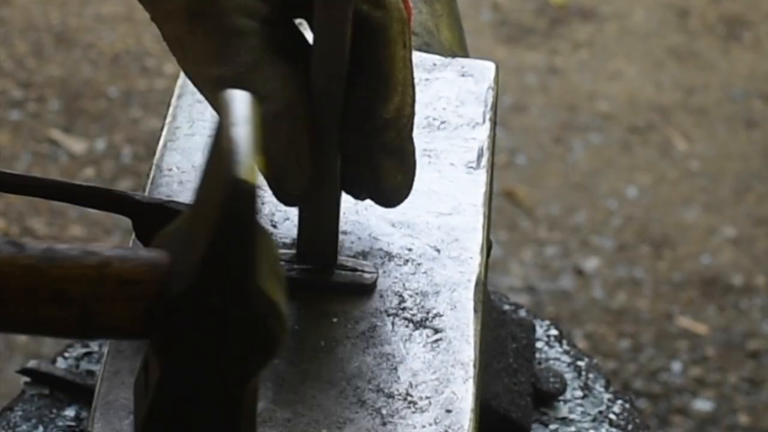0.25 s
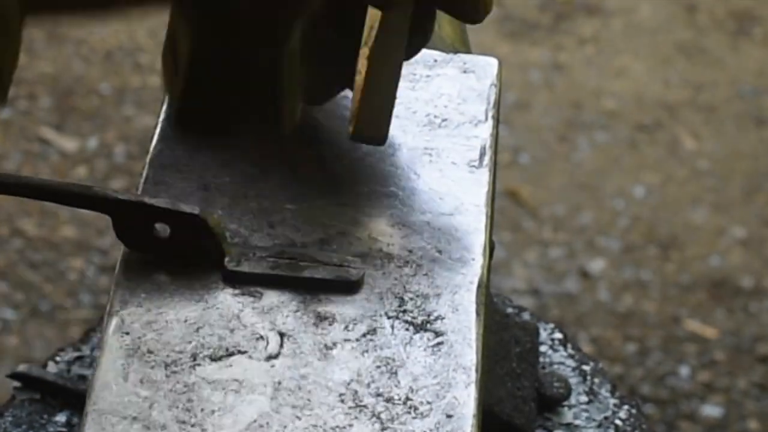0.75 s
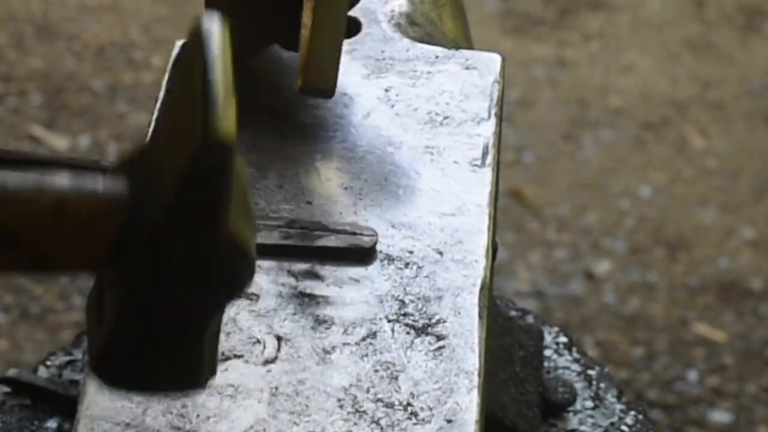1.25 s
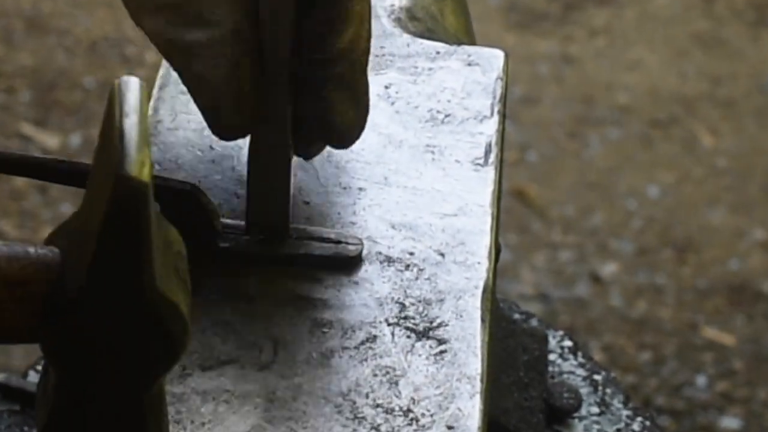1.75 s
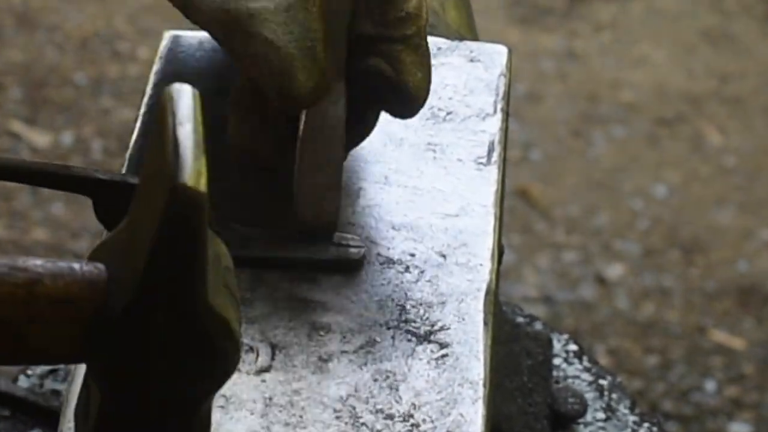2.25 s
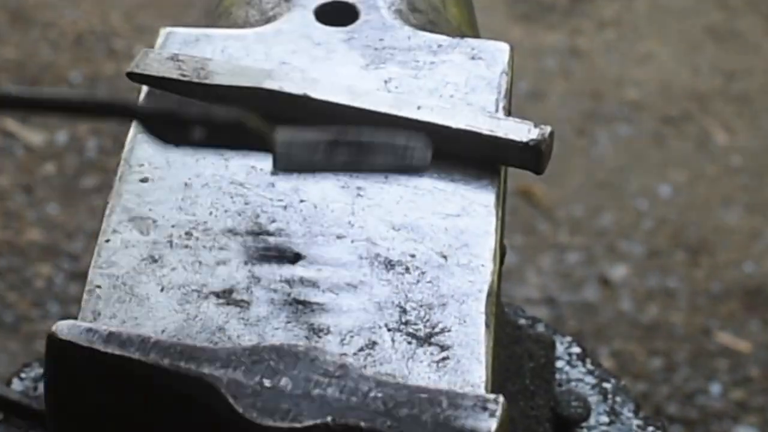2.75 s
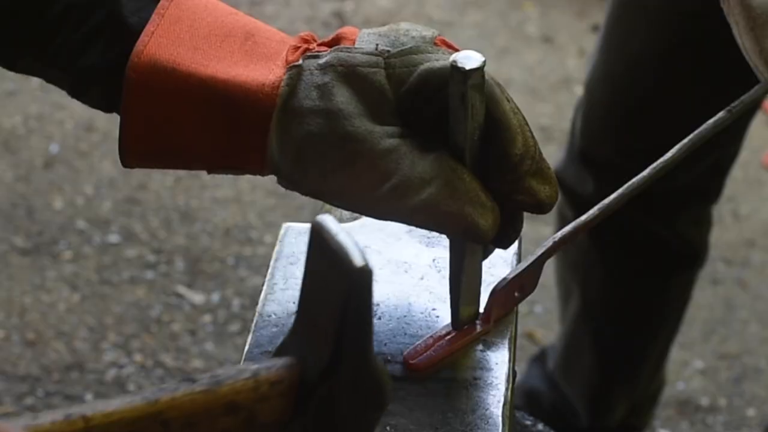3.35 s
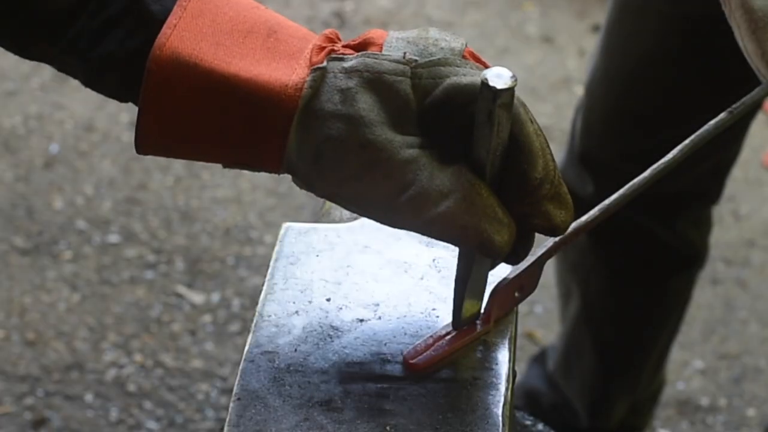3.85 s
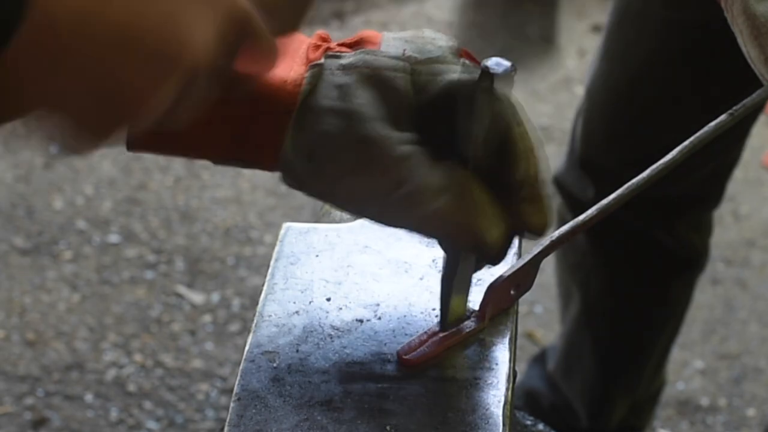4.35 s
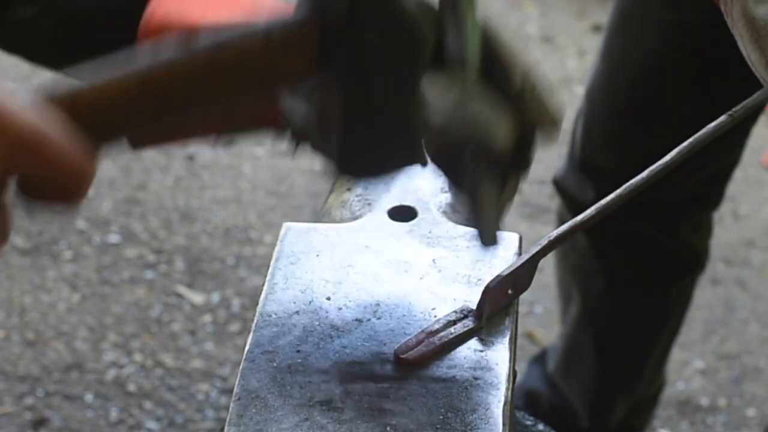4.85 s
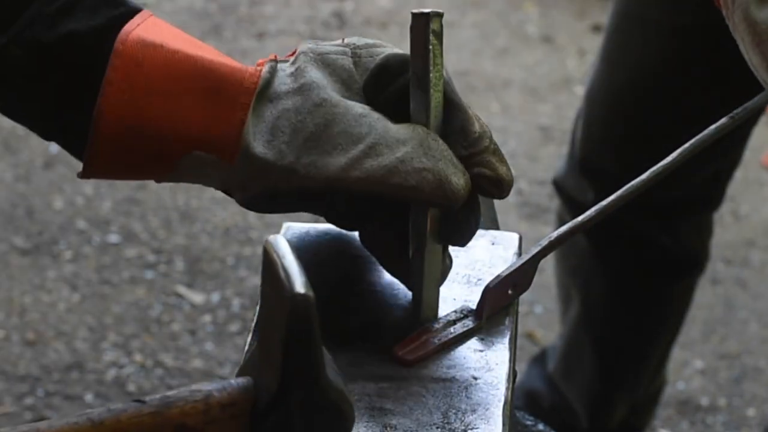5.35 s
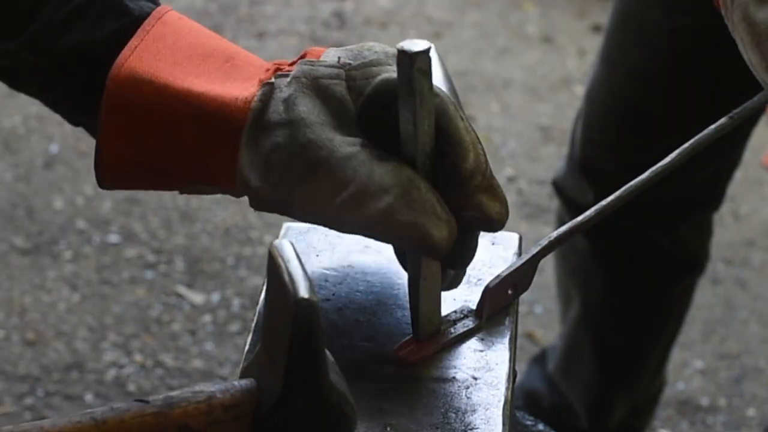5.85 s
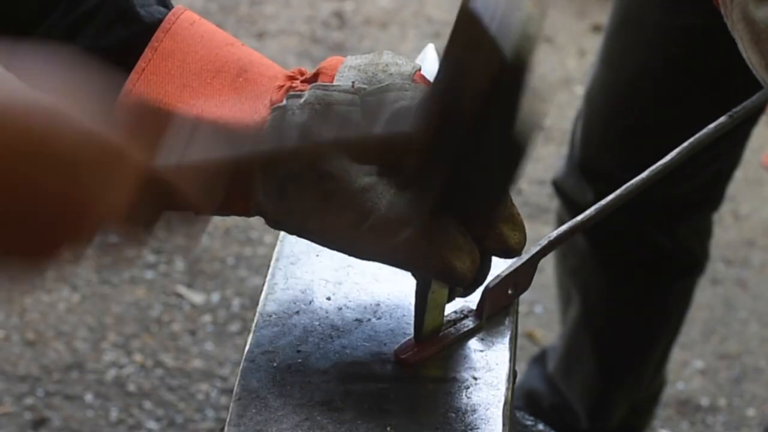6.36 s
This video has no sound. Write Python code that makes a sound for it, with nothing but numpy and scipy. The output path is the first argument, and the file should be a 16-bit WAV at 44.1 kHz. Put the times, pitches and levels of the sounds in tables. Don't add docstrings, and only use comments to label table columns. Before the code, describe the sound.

A forge blower runs throughout. From 0 to 3.4 s the sound is eight times too fast: the hum becomes a thin, high, airy whine, and chisel blows are dry, tiny snaps at about 0.4, 0.8, 1.3, 1.6, 1.9, 2.2 and 2.5 s. A hammer's rebounds buzz briefly at the very start and just after each blow. Around 2.75-2.88 s tongs and a tool clink in a tight rattle, then only hum. At 3.4 s it cuts to true speed, with a low wavering blower. Hard, clipping hammer-on-chisel blows crack at 4.18, 4.46 and 4.78 s, the last askew, with bright damped ringing, shop echo and a block boom; cuts chop the tails. From 5.15 s a hammer bounces, faster and softer, settling by 5.52 s. Brief dips come at 5.0 and 5.7 s; faint ticks at 5.07, 5.61, 5.71 and 6.11 s, then blower alone.

```python
import sys
import numpy as np
from scipy import signal
from scipy.fft import rfft, irfft, next_fast_len
from scipy.io import wavfile
from scipy.ndimage import uniform_filter1d

SR = 44100
rng = np.random.default_rng(int(sys.argv[2]) if len(sys.argv) > 2 else 0)


def store_wav(level_fs):
    pcm = np.round(np.clip(np.atleast_2d(level_fs), -1, 1) * 32767)
    wavfile.write(sys.argv[1], SR, pcm.T.astype(np.int16))


def linear_from_db(decibels):
    return 10 ** (np.asarray(decibels, float) / 20)


N = 290619

FAST, FAST_END_S = 8, 3.4
TOP_HZ = 15650
CONTACT_LAG_S = .0009
# [f/Hz, level/dB, t60/s]
CHISEL_MODES = [(700, -14, .3), (2035, -17, .25), (2935, -7, .4), (5630, -12, .4), (6600, -5, .25),
                (6655, -5, .23), (7004, -9, .33), (7400, -20, .25), (8021, -19, .22), (8231, -7, .22),
                (8452, -18, .2), (8818, -17, .23), (9297, -12, .15), (9469, -4, .22), (9520, -4, .18),
                (9830, -14, .2), (11250, -17, .2), (11790, -14, .15), (12690, -21, .2), (12930, -22, .22),
                (13220, -17, .14), (14060, -16, .17), (14260, -27, .2), (14870, -18, .29),
                (15150, -18, .17)]
# [f/Hz, level/dB, t60/s]
HAMMER_MODES = [(790, -10, .15), (1410, -12, .15), (1860, -7, .12), (2035, 1, .22), (2089, -5, .28),
                (2681, -12, .15), (2920, -10, .1), (3520, -8, .25), (4322, -12, .3), (5166, -14, .26),
                (5642, -15, .18), (6590, -13, .25), (6616, -8, .28), (7000, -22, .15), (8236, -24, .14),
                (8452, -21, .13), (9420, -24, .2), (9512, -20, .22), (9830, -24, .19), (11240, -25, .1),
                (11790, -37, .12), (12510, -35, .11), (12690, -35, .12), (13220, -38, .12),
                (14260, -30, .22), (15150, -42, .13)]


def add(out, i, x):
    out[i:i + len(x)] += x
    return out


def on_log(hz, table):
    f, v = np.transpose(table)
    return np.interp(np.log(np.maximum(hz, 1)), np.log(f), v)


def bands(size, speed):
    fast = next_fast_len(size)
    octave = np.log2(np.maximum(np.fft.rfftfreq(fast, 1 / SR), 1) / speed)
    noise = rfft(rng.standard_normal(fast))
    for centre in np.arange(3.5, np.log2(SR / 2 / speed) + .5, .5):
        weight = np.cos(np.pi * np.clip(octave - centre, -.5, .5))
        yield 2 ** centre, irfft(noise * weight, fast)[:size]


def walk(rate_hz, size):
    k = int(SR / rate_hz)
    steps = np.repeat(rng.standard_normal(size // k + 1), k)
    w = uniform_filter1d(uniform_filter1d(steps, k), k)[:size]
    return w / w.std()


def blower(size, speed, colour, rush_db, tone_db, waver_rad):
    # [f/Hz, width/Hz, level/dB]
    housing = [(120, 10, 3), (321, 25, 4), (354, 20, 5), (490, 35, 5), (625, 25, 6), (780, 30, 5),
               (1061, 20, 4), (1330, 90, 4), (2050, 150, 4)]
    # [f/Hz, level at true speed/dB, level when fast/dB]
    blade_tones = [(119.9, -57, -57), (353.3, -54, -53), (1060.5, -55.5, -62)]
    hz = np.fft.rfftfreq(size, 1 / SR)
    rush = 0
    for _, band in bands(size, speed):
        flicker_db = 0.87 * walk(2 * speed, size) + 1.3 * walk(12 * speed, size)
        rush = rush + band * linear_from_db(flicker_db)
    housing_db = sum(db / (1 + (2 * (hz / speed - f) / w) ** 2) for f, w, db in housing)
    low_cut = 1 / (1 + (16 * speed / (hz + 1)) ** 4)
    rush = irfft(rfft(rush) * linear_from_db(on_log(hz, colour) + housing_db) * low_cut, size)
    t = np.arange(size) / SR * speed
    tones = 0
    for f, true_db, fast_db in blade_tones:
        level_db = (fast_db if speed > 1 else true_db) + 1.7 * walk(6 * speed, size)
        phase = 2 * np.pi * f * t + waver_rad * walk(4 * speed, size)
        tones = tones + linear_from_db(level_db) * np.sin(phase)
    return rush / rush.std() * linear_from_db(rush_db) + np.sqrt(2) * tones * linear_from_db(tone_db)


def blower_hum():
    # [f/Hz, level/dB per Hz]
    true_rush = [(15, -44), (25, -12.5), (114, -4.5), (244, -8), (356, -3.5), (781, -14), (945, -15.5),
                 (1340, -17), (1580, -20.5), (4000, -35), (10500, -46.5), (14000, -59.5), (16300, -71)]
    fast_rush = [(88, -78), (150, -35), (235, -20.5), (506, -7.5), (826, -6.5), (929, -11.5), (1250, -11),
                 (2730, -7), (3190, -9), (8680, -19.5), (16300, -29)]
    cut = int(FAST_END_S * SR)
    fast = blower(cut, FAST, fast_rush, rush_db=-46, tone_db=0.33, waver_rad=0.19)
    true = blower(N - cut, 1, true_rush, rush_db=-42, tone_db=-.1, waver_rad=0.9)
    return np.append(fast, true)


def shop(speed, wet_db, early_db):
    # [f/Hz, t60/s]
    shop_t60 = [(50, 0.22), (200, 0.39), (700, 0.33), (2500, 0.35), (6000, 0.34), (11000, 0.26),
                (16000, 0.25)]
    # [t/s, level/dB]
    echoes = [(.0046, -13.5), (.009, -17)]
    tail_db, scatter_db, scatter_t60_s, smear_s = -28.5, 13.5, 0.017, .0003
    size = int(.6 * SR / speed)
    t = np.arange(size) / SR * speed
    room = 0
    for hz, band in bands(size, speed):
        tail = linear_from_db(wet_db - 60 * t / on_log(hz, shop_t60))
        scatter = linear_from_db(scatter_db + early_db - 60 * t / scatter_t60_s) * hz / (hz + 500)
        room = room + band * (tail + scatter)
    room *= linear_from_db(tail_db) * np.sqrt(speed) * np.minimum(t / 0.0035, 1)
    soft = np.hanning(int(smear_s * SR / speed) + 3)
    for s, db in echoes:
        room = add(room, int(s * SR / speed), linear_from_db(db) * soft / soft.sum())
    return room


def crack(colour, edge_db, size=4096):
    hz = np.fft.rfftfreq(size, 1 / SR)
    tilt_db = edge_db / (1 + (5000 / (hz + 1)) ** 2)
    cep = irfft(np.log(linear_from_db(on_log(hz, colour) + tilt_db)), size)
    cep[1:size // 2] *= 2
    cep[size // 2 + 1:] = 0
    click = irfft(np.exp(rfft(cep)), size)
    return -click / np.abs(click).max()


def strike(out, hits, colour, modes, speed=1, level_db=0, ring_db=-20, wet_db=0, early_db=-5,
           grip=.6, beam_db=-8, rough=0.3, split_hz=30):
    chops_s = [3.4, 4.407, 4.708, 5.001, 5.701, 7]
    chop_fade_s = .012
    hz, db, t60 = np.transpose([m for m in modes if m[0] * speed < TOP_HZ])[:, :, None]
    place = shop(speed, wet_db, early_db)
    for hit in hits:
        s, blow_db, own_ring_db, edge_db = tuple(hit) + (0,) * (4 - len(hit))
        room = .8 * place + .6 * shop(speed, wet_db, early_db)
        t = np.arange(len(room)) / SR * speed
        chance = rng.standard_normal((len(hz), 3)).T[:, :, None]
        beat = 1 + rough * sum(np.sin(2 * np.pi * (split_hz * c * t + c)) for c in chance[1:])
        decay = linear_from_db(db + 1.5 * chance[0] - 60 * t / (grip * t60))
        rings = beat * np.sin(2 * np.pi * hz * t) * decay
        ring = linear_from_db(ring_db + own_ring_db) * rings.sum(axis=0) * np.minimum(t / 0.00023, 1)
        click = np.append(crack(colour, edge_db), 0 * t)[:len(t)]
        answer = signal.fftconvolve(click + linear_from_db(beam_db) * ring, room)[:len(t)]
        i = int((s + CONTACT_LAG_S) * SR)
        wet = (click + ring + answer)[:N - i]
        left_s = min(c for c in chops_s if c > s) - s - np.arange(len(wet)) / SR
        out = add(out, i, wet * np.clip(left_s / chop_fade_s, 0, 1) * linear_from_db(blow_db + level_db))
    return out


def ticks(out):
    # [t/s, level/dB]
    times = [
        (5.0719, -39),
        (5.6114, -39),
        (5.7129, -44),
        (6.1144, -53),
    ]
    # [f/Hz, level/dB]
    colour = [(500, -10), (2000, -12), (3100, -1.5), (5000, -18), (9000, -23), (17000, -39.5)]
    return strike(out, times, colour, HAMMER_MODES, level_db=6.0, ring_db=-35, wet_db=-7, grip=.3)


def tools_laid_down(out):
    # [t/s, level/dB, ring/dB]
    clinks = [
        (2.7784, -21.5, -12),
        (2.7913, -28, -6.5),
        (2.796, -31.5, -1),
        (2.8008, -18.5, -3.5),
        (2.8051, -38.5, -5),
        (2.81, -33, 2),
        (2.8737, -33.5, 11.5),
        (2.8784, -19.5, 2),
    ]
    # [t/s, level/dB]
    tongs = [
        (2.7446, -32),
        (2.7541, -29),
    ]
    # [f/Hz, level/dB]
    colour = [(300, -33), (2500, -2), (5000, -1), (8000, -5), (13000, 0), (17000, 6)]
    # [f/Hz, level/dB, t60/s]
    tool_modes = [(892, -4, 0.19), (1690, -6, 0.32), (1810, -16, .14), (1650, -12, .1)]
    tong_modes = [(1036, 8, 0.5), (1075, -11, .4)]
    out = strike(out, clinks, colour, tool_modes, speed=FAST, level_db=8.0, ring_db=-9.0,
                 wet_db=-3, early_db=-19, grip=0.31)
    return strike(out, tongs, colour, tong_modes, speed=FAST, level_db=-1.0, ring_db=-15,
                  wet_db=-9, grip=.9)


def rebounds(drops, drop_db):
    hits = []
    for (s, flight_s, kept), db in zip(drops, drop_db):
        hits.append((s, db))
        for k in range(4):
            s = s + flight_s * kept ** k
            hits.append((s, db - 4 - 5 * k))
    return hits


def fast_hammer_bounces(out):
    # [t/s, first flight/s, share of flight time kept per rebound]
    drops = [(.0148, .0131, .56), (.4493, .0174, .48), (.8598, .0123, .49), (1.3420, .0122, .52),
             (1.6260, .0143, .49), (1.9925, .0121, .52), (2.2895, .0158, .55), (2.5792, .0130, .55)]
    drop_db = [-14, -13.5, -14.5, -13.5, -14, -14, -11.5, -12]
    # [f/Hz, level/dB]
    colour = [(180, -53), (300, -7), (2720, -1), (3740, -2), (4570, -12), (6710, -4), (9850, -9),
              (11100, -6), (12000, -6), (14700, -9.5), (16300, 5.5)]
    return strike(out, rebounds(drops, drop_db), colour, HAMMER_MODES, speed=FAST, level_db=1.9,
                  ring_db=-29.5, wet_db=0.5, early_db=12, grip=0.3)


def hammer_bounces(out):
    # [t/s, level/dB, ring/dB, hard edge/dB]
    bounces = [
        (5.1544, 1.5, -3, -6.5),
        (5.3171, -1, 2, -2.5),
        (5.415, -3.5, 1.5, -1),
        (5.483, -6.5, -1.5, -3),
        (5.5222, -12.5, -1, -7),
    ]
    # [f/Hz, level/dB per Hz]
    colour = [(35, -86), (70, 0.5), (380, -3.5), (800, -3.5), (1100, -4.5), (2000, 1.5), (3000, -4.5),
              (4400, -11.5), (6500, -19.5), (9700, -34), (14800, -39), (16300, -72)]
    return strike(out, bounces, colour, HAMMER_MODES, level_db=2.5, ring_db=-25.0, wet_db=-9,
                  early_db=1.0, grip=0.75, beam_db=-11, rough=.5, split_hz=30)


def stand(out, hits, level_db):
    # [f/Hz, level/dB, t60/s]
    block_modes = [(52.4, -26, .2), (95, -25.5, .2), (150.3, -23.5, 0.25), (189.3, -24.5, 0.27),
                   (230.8, -23.5, .3), (423.8, -29, .2), (730, -28, 0.26)]
    rise_s = 0.01
    t = np.arange(int(.22 * SR)) / SR
    boom = sum(linear_from_db(db - 60 * t / t60) * np.sin(2 * np.pi * hz * t) for hz, db, t60 in block_modes)
    thud = (1 - np.exp(-t / rise_s)) * boom
    for s, db, *_ in hits:
        out = add(out, int((s + CONTACT_LAG_S) * SR), thud * linear_from_db(db + level_db))
    return out


def fast_chisel_blows(out):
    # [t/s, level/dB, hard edge/dB]
    blows = [
        (0.395, -4, 8),
        (0.797, -3.5, 1),
        (1.284, -2.5, 1.5),
        (1.569, -1.5, 4.5),
        (1.933, -1.5, 9),
        (2.234, -2, 3),
        (2.533, -2.5, 2.5),
    ]
    # [f/Hz, level/dB per Hz]
    colour = [(35, -17), (90, -9), (250, -5), (750, 4.5), (1500, -2), (2200, -1), (4400, -5.5),
              (5600, -7.5), (8600, -10.5), (11000, -13.5), (15200, -13.5), (16300, -25)]
    hits = [(s, db, 0, edge_db) for s, db, edge_db in blows]
    return strike(out, hits, colour, CHISEL_MODES, speed=FAST, level_db=0.7, ring_db=-36.5,
                  wet_db=-0.44, early_db=6.0, grip=0.43)


def chisel_blows(out):
    # [t/s, level/dB, ring/dB, hard edge/dB]
    square_blows = [
        (4.182, 8, 2.5, 2),
        (4.4554, 9.5, 0.5, 6),
    ]
    askew_blow = [
        (4.7780, 7, -1.3, 7.5),
    ]
    # [f/Hz, level/dB per Hz]
    colour = [(15, -37.5), (40, -1), (140, 1), (720, -3), (1150, -13), (2000, -9.5), (2950, -16),
              (3500, -17.5), (6000, -20), (6800, -19), (8500, -29), (9500, -13), (11000, -30), (16300, -40)]
    # [f/Hz, level/dB, t60/s]
    askew_modes = [(2040, -8, .3), (2960, -7, .3), (5630, -14, .36), (6610, -6, .3), (7950, -14, .25),
                   (15150, -16, .2), (9500, -6, .12), (9830, -8, .25), (11250, -14, .2), (11790, -12, .2),
                   (12510, -15, .2), (12930, -15, .22), (13220, -16, .2), (14060, -13, .2)]
    out = strike(out, square_blows, colour, CHISEL_MODES, level_db=0.0, ring_db=-22, wet_db=-0.5,
                 early_db=7.5, grip=0.54, beam_db=-5, rough=0.1, split_hz=33)
    out = strike(out, askew_blow, colour, askew_modes, level_db=0.5, ring_db=-17.5, wet_db=1.8,
                 early_db=6.5, grip=0.55, beam_db=-8.5, rough=0.3, split_hz=57)
    return stand(out, square_blows + askew_blow, level_db=1.0)


def scene():
    dips_s = [5.001, 5.701]
    dip_s = .015
    out = blower_hum()
    out = ticks(out)
    out = tools_laid_down(out)
    out = fast_hammer_bounces(out)
    out = hammer_bounces(out)
    out = fast_chisel_blows(out)
    out = chisel_blows(out)
    t = np.arange(N) / SR
    for s in dips_s:
        out = out * np.clip(np.abs(t - s) / dip_s, .03, 1)
    return out[None]


def roll_off(x):
    return signal.sosfilt(signal.butter(12, 16410, fs=SR, output="sos"), x)


def record(dry):
    low_pass = signal.ellip(8, .2, 60, TOP_HZ, fs=SR, output="sos")
    x = signal.sosfilt(low_pass, np.clip(dry, -.95, .95))
    return roll_off(np.clip(x, -1, 1))


dry = scene()
out = record(dry)
store_wav(out)
```